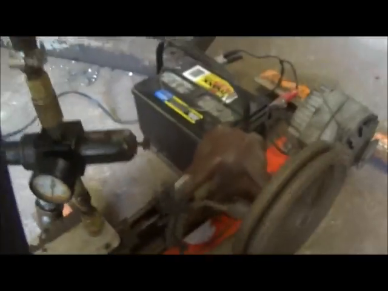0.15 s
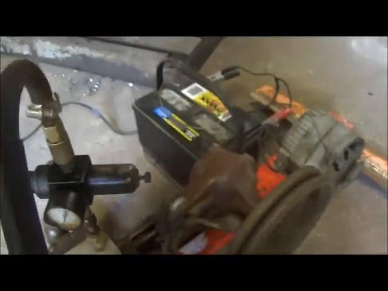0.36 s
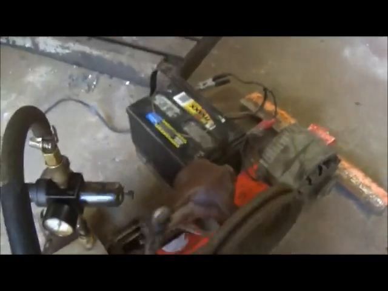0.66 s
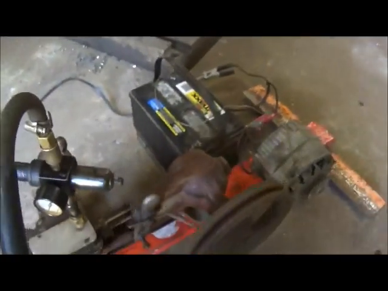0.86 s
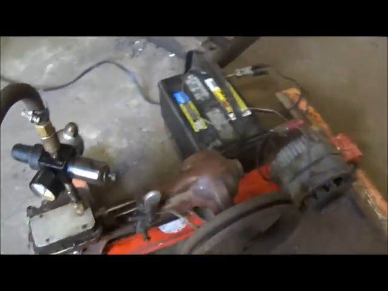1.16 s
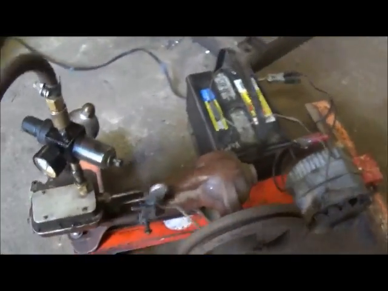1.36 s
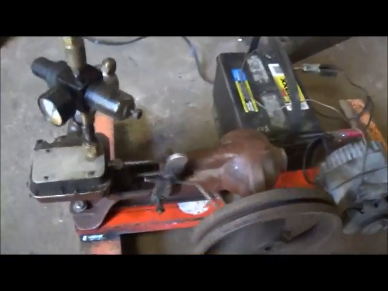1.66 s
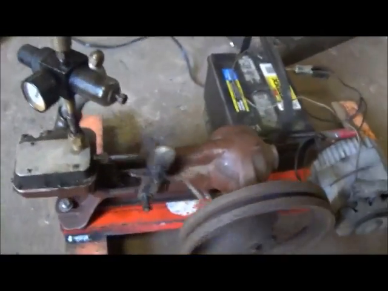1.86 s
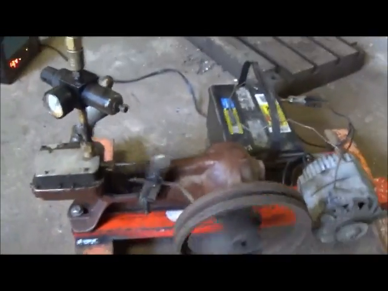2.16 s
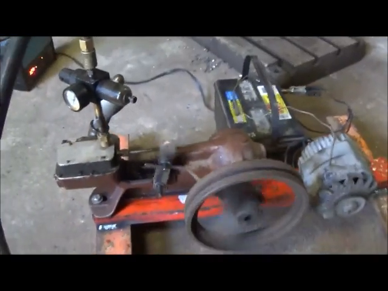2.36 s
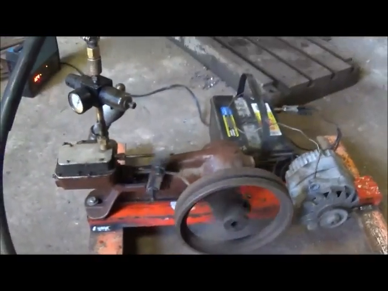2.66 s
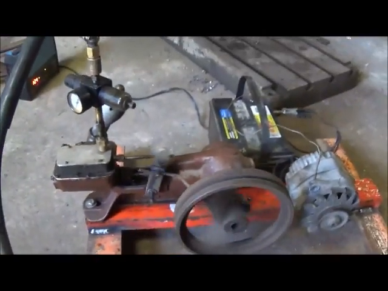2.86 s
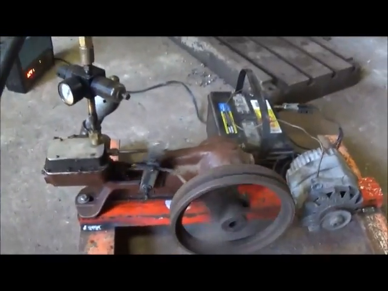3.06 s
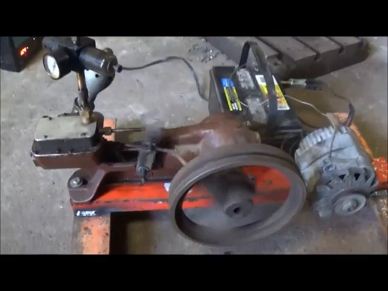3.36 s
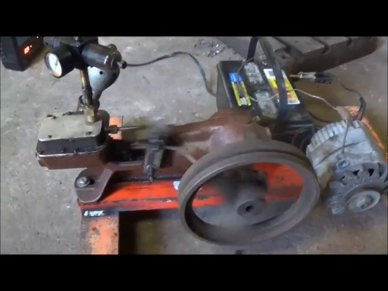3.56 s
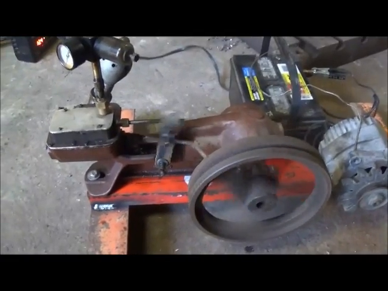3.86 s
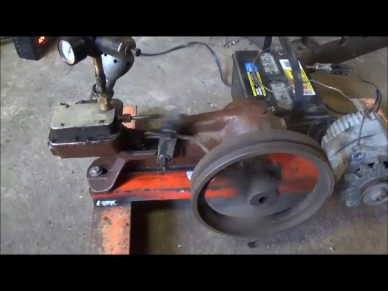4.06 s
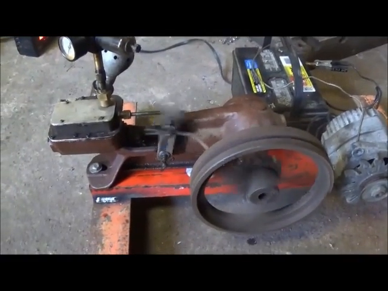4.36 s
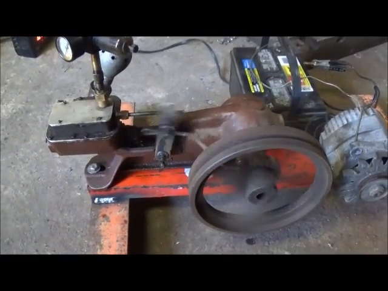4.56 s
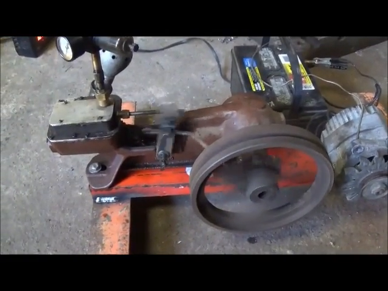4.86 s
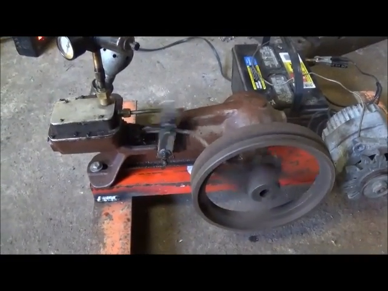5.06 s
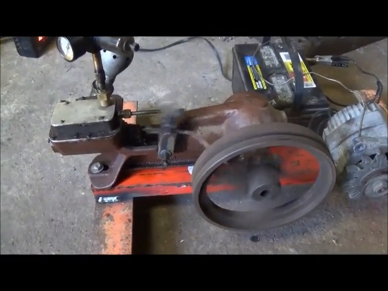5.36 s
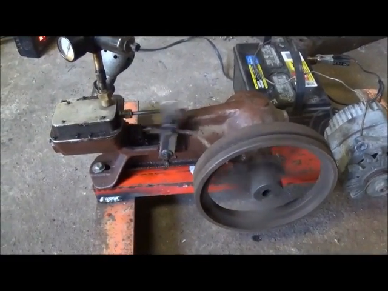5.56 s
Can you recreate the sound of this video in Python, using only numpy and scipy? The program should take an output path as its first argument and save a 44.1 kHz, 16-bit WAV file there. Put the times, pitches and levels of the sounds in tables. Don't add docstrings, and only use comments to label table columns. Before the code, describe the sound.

From 0 to about 5.7 seconds a small piston engine runs nonstop on compressed air, at an almost constant ten turns a second. Every turn repeats a tight round: short low thumps, dense rattling of loose iron parts, bright airy puffs, little valve whistles and linkage ticks, slightly uneven from turn to turn. Leaking air hisses steadily behind it, fluttering a little. A sharp tappet click on every second turn stands out until about 1.3 seconds, then drops back. Between 2 and 3.4 seconds the microphone moves from cylinder end to flywheel side, and the balance of metallic ringing and puffs shifts while the clatter softens slightly. Faint swells from the engine shifting blend in near 1.9, 3.5, 4.1 and 4.7 seconds. The sound is close, near centre and slightly left at first, with a short, wide workshop echo, quiet low rumble and a phone-like cut-off treble. It ends still running.

```python
import sys
import numpy as np
from scipy import signal
from scipy.fft import rfft, irfft, next_fast_len
from scipy.io import wavfile
from scipy.ndimage import uniform_filter1d

SR = 44100
rng = np.random.default_rng(int(sys.argv[2]) if len(sys.argv) > 2 else 0)


def natural_amplitude(level_db):
    exponent = np.asarray(level_db, float) / 20
    return 10 ** exponent


def generate_wav(signal):
    frames = np.transpose(np.atleast_2d(signal))
    scaled = np.clip(frames, -1, 1) * 32767
    pcm = np.round(scaled).astype(np.int16)
    wavfile.write(sys.argv[1], SR, pcm)


N = 252375

PUSH, THUMP, BLOW, CLOSE, INLET, RISE, FILL = -.037, -.004, .03, .078, .2, .25, .29
LOAD, STRAIN, BACK, VENT, KNOCK, HUM, CAM, LIFT, TRIP, SLAP = .32, .43, .475, .54, .62, .7, .79, .882, .9, .93
START_TURN = .6189

# [t/s, speed/(turns per s)]
CRANK_SPEED = [
    (0, 9.9982),
    (1.2, 9.9276),
    (2.2, 9.926),
    (4.4, 9.9739),
    (5.72, 9.9543),
]
# [t/s, way round/0-1 (0 cylinder end, 1 flywheel side)]
MIC_WALK = [
    (0, 0.19),
    (1.2, 0.028),
    (2.0, .1),
    (2.45, 0.58),
    (3.4, .97),
    (5.72, 0.87),
]
LOOSE_PLAY = [
    (LOAD, 0.06, 0.89),
    (STRAIN, 0.072, 1.04),
    (PUSH, 0.095, 1.25),
    (CAM, 0.097, 0.35),
    (HUM, 0.09, 0.44),
    (KNOCK, 0.024, 0.46),
    (CLOSE, 0.051, 0.31),
]
# [f/Hz, width/Hz, level at cylinder end/dB, level at flywheel side/dB]
CASTING_MODES = [(320, 75, -20, -20.5), (599, 420, -4, -4.5), (833, 65, -6.5, 0), (1000, 180, -2.5, -8),
                 (1099, 89, 5, 1), (1293, 410, -9.5, 0), (1549, 72, -2.5, -3.5), (2166, 68, -11, -8.5),
                 (2520, 64, -5.5, -4), (2907, 70, -3.5, -3.5), (3210, 170, -7, -9), (3400, 44, -7.5, -7),
                 (3802, 147, -1.5, 1), (2600, 3100, -3, -3)]
# [moment/turns, push length/turns, signed shape weight/1, level/dB]
EXHAUST_THUMPS = [
    (PUSH, 0.0059, 0.77, -47),
    (THUMP, 0.0081, -0.53, -46),
    (BACK, 0.0045, 0.66, -47.5),
    (LOAD, 0.049, 0.62, -66),
]
# [f/Hz, width/Hz, level/dB]
TIMBER_FRAME = [
    (100, 34, -14.5),
    (180, 48, 0),
    (70, 28, -53),
]
# [moment/turns, length/turns, f/Hz, width/Hz, level at cylinder end/dB, level at flywheel side/dB]
PORT_PUFFS = [(RISE, 0.12, 6610, 420, -35.5, -37), (FILL, 0.11, 5860, 720, -40.5, -36.5),
              (RISE, 0.1, 8030, 1700, -32, -31.5), (VENT, 0.18, 8740, 3000, -30.5, -29.5),
              (VENT, 0.15, 10470, 330, -35.5, -35), (VENT, 0.043, 8450, 1900, -36.5, -44),
              (VENT, 0.14, 9650, 1100, -44, -32), (BLOW, 0.074, 5600, 4100, -34, -34),
              (BLOW, 0.059, 4036, 370, -39, -39), (THUMP, .05, 10300, 1600, -37.5, -38.5),
              (CAM, 0.044, 9420, 1700, -31, -34), (TRIP, 0.012, 5100, 1400, -41, -37.5),
              (LOAD, .07, 10580, 910, -41.5, -40), (BLOW, .02, 8900, 1300, -43, -37.5),
              (CLOSE, 0.017, 8900, 3500, -35, -39), (LOAD, 0.11, 2590, 330, -37.5, -42)]
# [moment/turns, length/turns, f/Hz, width/Hz, level at cylinder end/dB, level at flywheel side/dB]
VALVE_LINKAGE_NOTES = [(INLET, 0.03, 8150, 272, -35.5, -33.5), (RISE, 0.02, 8300, 380, -35.5, -38.5),
                       (INLET, 0.052, 7530, 310, -28.5, -45), (RISE, 0.082, 4850, 164, -47, -33.5),
                       (RISE, 0.11, 3850, 247, -38.5, -36), (CLOSE, 0.0095, 9620, 305, -39, -34.5),
                       (CLOSE, 0.0047, 10700, 510, -37, -42.5), (CAM, 0.016, 9600, 292, -54, -37),
                       (LIFT, 0.0074, 9580, 318, -39, -31.5), (CAM, 0.022, 3850, 330, -40, -39.5),
                       (KNOCK, 0.041, 1760, 207, -50, -39.5), (SLAP, 0.066, 1720, 264, -44.5, -37),
                       (HUM, 0.038, 330, 60.7, -57, -48.5), (VENT, 0.11, 9080, 370, -30.5, -34)]
# [t/s, length/s, f/Hz, width/Hz, level/dB]
TIMBER_BUMPS = [
    (1.9, 0.033, 230, 29, -37),
    (3.48, 0.068, 830, 39, -24),
    (4.73, 0.041, 290, 9.7, -32.5),
    (4.1, 0.028, 1170, 121, -26),
    (3.5, 0.014, 2900, 79, -29),
]
# [f/Hz, level per Hz/dB]
LEAK_COLOUR = [(20, -46), (60, -48), (140, -12.5), (300, -8.5), (420, -17.5), (900, -2), (2000, -13),
               (4200, -7.5), (5400, -8), (6400, -6.5), (7200, 0), (8500, -2.5), (9400, 1), (11500, -8.5)]
# [f/Hz, width/Hz, level/dB]
WORKSHOP_RUMBLE = [
    (30, 30, -77),
    (69.5, 33, -67),
    (101, 22, -56),
    (163, 42, -62.5),
]


def ring(x, hz, width_hz):
    return signal.lfilter(*signal.iirpeak(hz, hz / max(width_hz, 5), SR), x)


def level(x, db):
    return x * natural_amplitude(db) / np.sqrt(np.mean(x ** 2))


def once_a_turn(crank, angle, length, scatter_db, slack, rise=0.79):
    chance = rng.standard_normal((64, 2))
    turn = np.round(crank - angle).astype(int) + 1
    lateness = slack * chance[turn, 0]
    off = (crank + 1 - angle - turn - lateness) / max(length, 1e-4)
    bell = np.exp(-np.where(off < 0, rise * off, off) ** 2)
    return natural_amplitude(scatter_db * chance[turn, 1]) * bell


def grit(spread_db):
    return rng.standard_normal(N) * natural_amplitude(spread_db * rng.exponential(size=N))


def flutter(rate, db):
    hold = int(SR / rate)
    steps = np.repeat(rng.standard_normal(N // hold + 1), hold)
    return natural_amplitude(db * uniform_filter1d(steps, hold)[:N])


def warble(hz, width_hz):
    detune = 1 + .008 * rng.standard_normal(N // 4000 + 1)
    pitch = hz * np.repeat(detune, 4000)[:N]
    phase_jitter = np.sqrt(2 * np.pi * abs(width_hz) / SR) * rng.standard_normal(N)
    return np.sin(np.cumsum(2 * np.pi * pitch / SR + phase_jitter))


def casting(crank, way, db):
    force = 0.8
    for angle, length, strength in LOOSE_PLAY:
        force = force + strength * once_a_turn(crank, angle, length, 1.66, 0.0071)
    knocks = force * flutter(120, 1.57) * grit(2.34)
    stray = grit(1.64)
    body = 0
    for k, (hz, width, end_db, side_db) in enumerate(CASTING_MODES):
        own = 0.86 * force * np.roll(stray, rng.integers(N))
        mode = level(ring(knocks + own, hz, width), end_db)
        body = body + (-1) ** k * mode * natural_amplitude(way * (side_db - end_db))
    return level(body, 1.0) * natural_amplitude(db)


def thumps(crank):
    push = 0
    for angle, length, sign, db in EXHAUST_THUMPS:
        push = push + sign * level(once_a_turn(crank, angle, length, 1.3, 0.0021), db)
    push = push - uniform_filter1d(uniform_filter1d(push, size=400), size=400)
    frame = sum(natural_amplitude(db) * ring(push, hz, width) for hz, width, db in TIMBER_FRAME)
    return push + 0.36 * frame


def bursts(crank, way, table, scatter_db, slack, pitched):
    out, air = 0, rng.standard_normal(N)
    for angle, length, hz, width, end_db, side_db in table:
        gate = once_a_turn(crank, angle, length, scatter_db, slack, rise=1.38)
        if pitched:
            drive = warble(hz, .6 * width)
        else:
            drive = ring(np.roll(air, rng.integers(N)), hz, width)
        burst = level(ring(gate * drive, hz, width), end_db)
        out = out + burst * natural_amplitude(way * (side_db - end_db))
    return out


def tappet(crank, way):
    hidden_s, shade_db = 1.27, -12
    tap = once_a_turn(crank / 2, (1 + LIFT) / 2, .00012, 1., .001)
    click = ring(ring(tap, 4950, 1500), 4900, 1500)
    hidden = np.clip((np.arange(N) / SR - hidden_s) / .2 + .5, 0, 1)
    return level(click, -38.5) * natural_amplitude(shade_db * (hidden + np.clip(way, 0, 1)))


def bumps(t):
    out = 0
    for start, length, hz, width, db in TIMBER_BUMPS:
        swell = np.exp(-((t - start) / length) ** 2)
        out = out + natural_amplitude(db) * swell * warble(hz, width)
    return out


def leak(db):
    hz, colour_db = np.transpose(LEAK_COLOUR)
    size = next_fast_len(N)
    f = np.fft.rfftfreq(size, 1 / SR) + 1
    colour = natural_amplitude(np.interp(np.log(f), np.log(hz), colour_db))
    hiss = irfft(rfft(rng.standard_normal(size)) * colour, size)[:N]
    return level(hiss, -1.97) * flutter(45, 1.46) * natural_amplitude(db)


def walls(x, count=3):
    t60_s, echo_db = 0.19, -9
    t = np.arange(int(.3 * SR)) / SR
    tails = rng.standard_normal((count, 2, len(t))) * natural_amplitude(-60 * t / t60_s) * (t > .003)
    tails = tails * natural_amplitude(echo_db) / np.sqrt(np.sum(tails ** 2, axis=2, keepdims=True))
    place = np.linspace(0, count - 1, N)
    echo = 0
    for k, tail in enumerate(tails):
        fade = np.cos(np.pi / 2 * np.clip(place - k, -1, 1))
        echo = echo + signal.oaconvolve((x * fade)[None], tail, axes=1)[:, :N]
    return echo


def rumble():
    mid, side = rng.standard_normal((2, N))
    noise = mid + 0.083 * side * np.array([[1], [-1]])
    return sum(level(ring(noise, hz, width), db) * flutter(5.4, 2.4) for hz, width, db in WORKSHOP_RUMBLE)


def scene():
    t = np.arange(N) / SR
    crank = START_TURN + np.cumsum(np.interp(t, *np.transpose(CRANK_SPEED))) / SR
    way = np.interp(t, *np.transpose(MIC_WALK))

    def between(end, side):
        return end + (side - end) * way

    port_way = 0.14 + (0.86 - 0.14) * np.clip(1.54 * way, 0, 1)
    engine = casting(crank, way, between(-23, -25.5)) + leak(between(-21, -21.5))
    engine = engine + bursts(crank, port_way, PORT_PUFFS, 2.04, 0.0044, pitched=False)
    engine = engine + bursts(crank, port_way, VALVE_LINKAGE_NOTES, 1.2, 0.0066, pitched=True)
    tappet_click = tappet(crank, way)
    engine = engine + tappet_click + bumps(t)
    head_shade = 0.36 * np.clip(1 - port_way, 0, 1)
    engine = engine - head_shade * ring(engine - tappet_click, 5500, 1700)
    engine = engine - 0.63 * ring(engine, 406, 99)
    pan_db = between(0.95, .2)
    direct = engine * natural_amplitude(np.array([pan_db, -pan_db]) / 2)
    return direct + walls(engine) + thumps(crank) + rumble()


def low_pass(x):
    return signal.sosfilt(signal.butter(12, 12000, fs=SR, output="sos"), x)


def record(dry):
    top_hz, ceiling = 11015, 0.46
    size = next_fast_len(N)
    passed = np.fft.rfftfreq(size, 1 / SR) < top_hz
    x = irfft(rfft(dry, size) * passed, size)[:, :N]
    over = np.maximum(np.abs(x) - ceiling, 0)
    mix = x - np.sign(x) * (over - .15 * np.tanh(over / 0.14))
    return low_pass(mix)


dry = scene()
out = record(dry)
generate_wav(out)
```